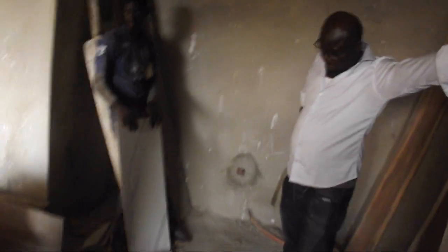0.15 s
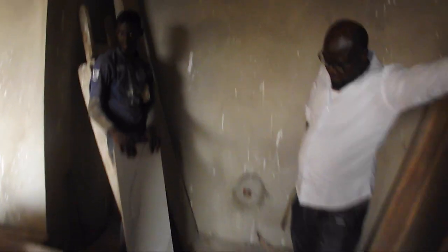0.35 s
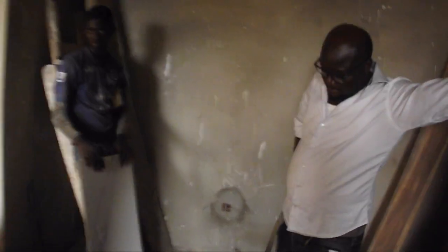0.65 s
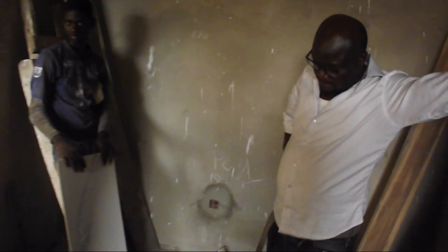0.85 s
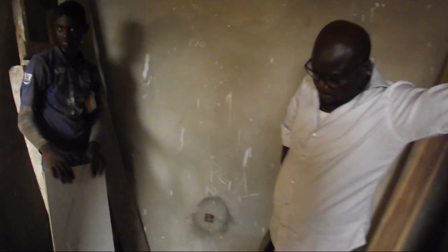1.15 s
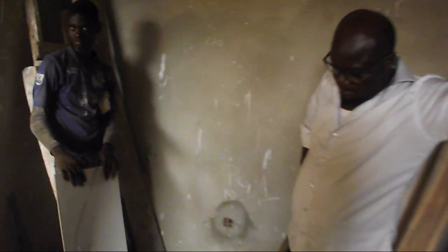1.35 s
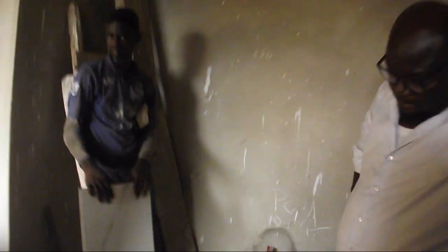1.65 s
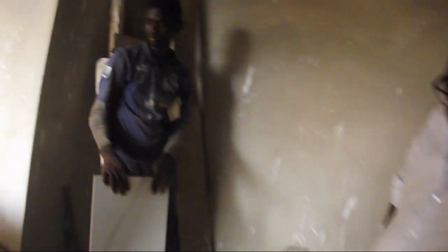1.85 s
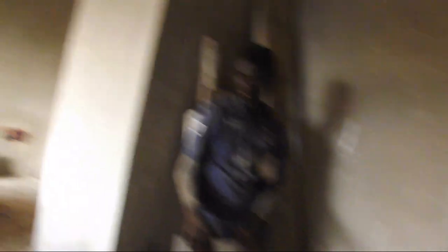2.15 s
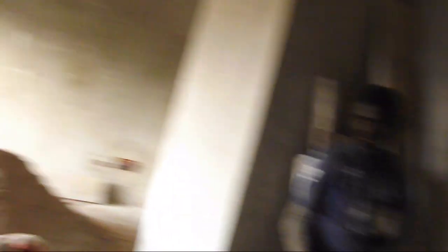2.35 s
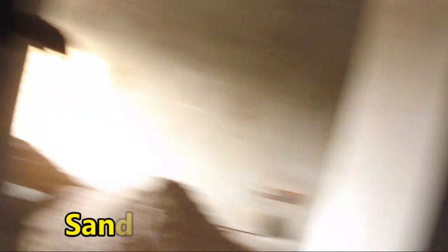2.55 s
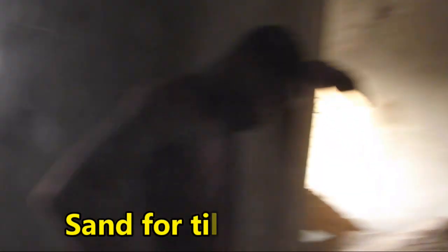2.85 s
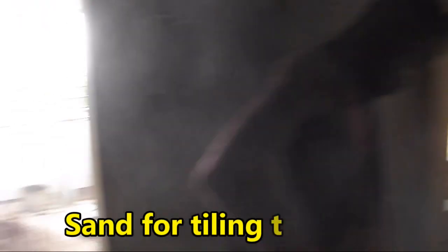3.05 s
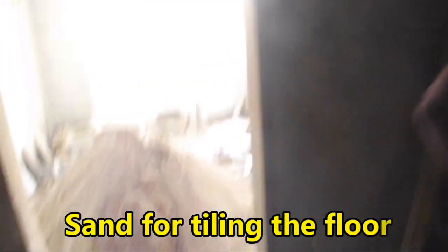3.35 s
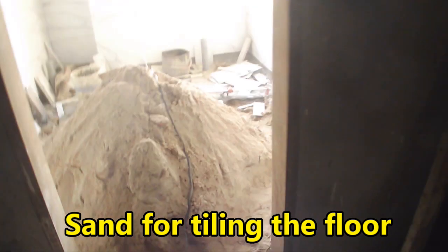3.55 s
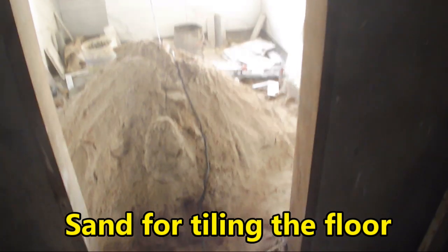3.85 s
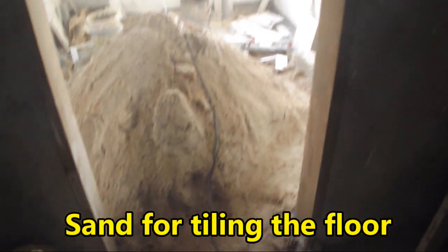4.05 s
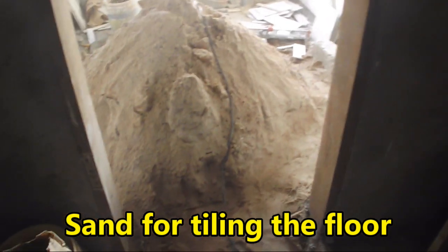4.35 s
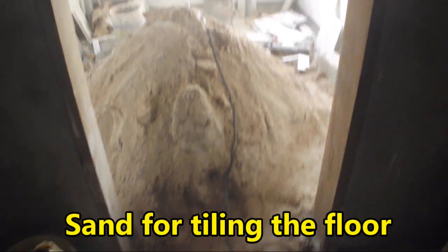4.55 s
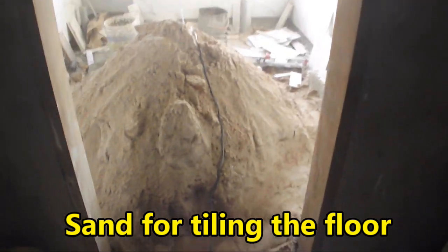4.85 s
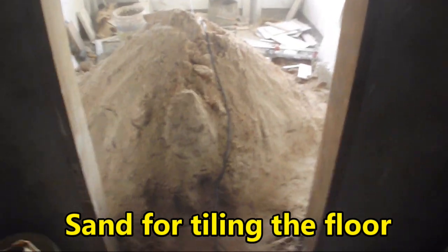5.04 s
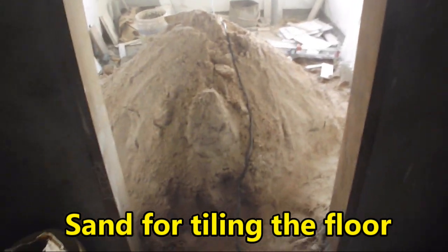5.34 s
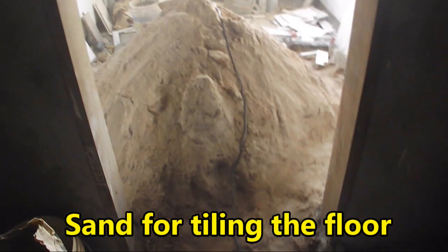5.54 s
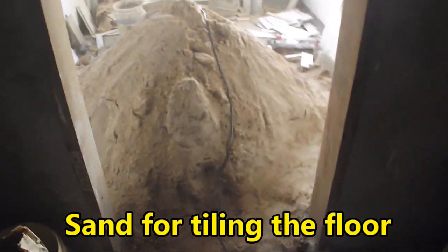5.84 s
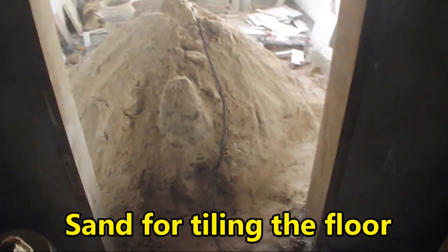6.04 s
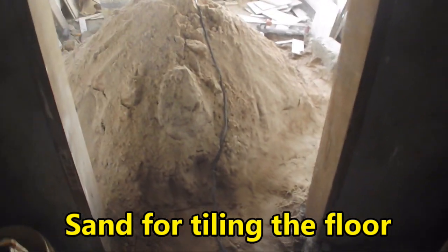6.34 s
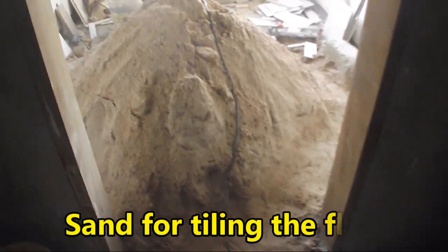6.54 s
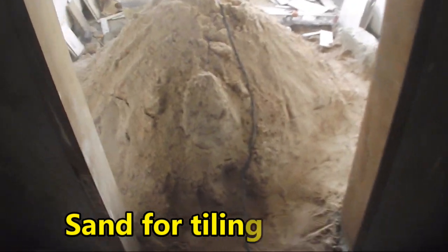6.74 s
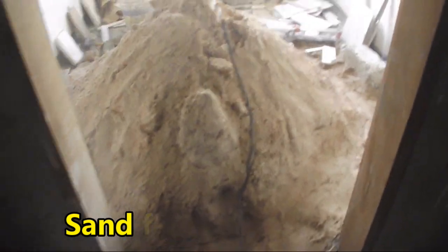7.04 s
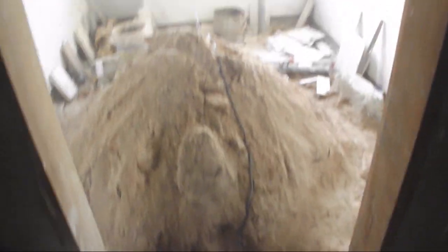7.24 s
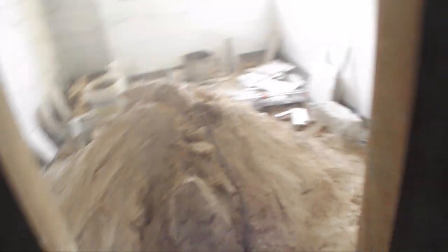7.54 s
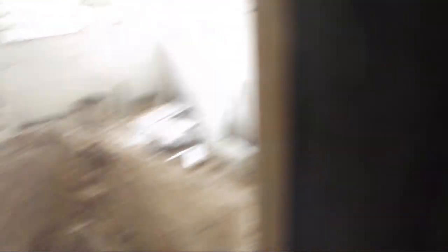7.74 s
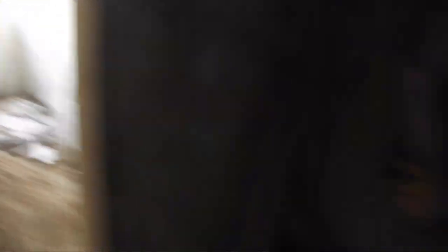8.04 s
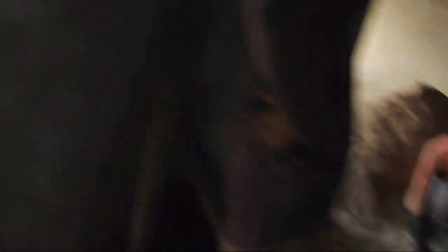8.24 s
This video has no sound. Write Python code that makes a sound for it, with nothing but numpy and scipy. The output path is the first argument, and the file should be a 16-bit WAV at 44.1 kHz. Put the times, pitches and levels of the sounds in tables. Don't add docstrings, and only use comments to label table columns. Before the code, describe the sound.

Loud, steady tile cutting in an unfinished building with hard walls. The spinning disc screeches brightly over a buzzing tonal whine that sags slightly in pitch. Frequent small snaps crackle through the scrape, making the level flutter as automatic gain ducks and recovers. The moving microphone shifts the colour, gaining body and low end in the last moments.

```python
import sys
import numpy as np
from scipy import signal
from scipy.io import wavfile
from scipy.ndimage import uniform_filter1d, minimum_filter1d

SR = 44100
rng = np.random.default_rng(int(sys.argv[2]) if len(sys.argv) > 2 else 0)


def convert_level_to_amplitude(level_db):
    exponent = np.asarray(level_db, float) / 20
    return 10 ** exponent


def store_wav(level_fs):
    pcm = np.round(np.clip(np.atleast_2d(level_fs), -1, 1) * 32767)
    wavfile.write(sys.argv[1], SR, pcm.T.astype(np.int16))


N = 369999


def rms_one(x):
    return x / np.sqrt(np.mean(x ** 2) + 1e-20)


def in_time(rows):
    s, *columns = np.transpose(rows)
    return [np.interp(np.arange(N) / SR, s, c) for c in columns]


def drift(rate_hz):
    r = np.exp(-200 * np.pi * rate_hz / SR)
    noise = rng.standard_normal(N // 100 + 1002)
    slow = signal.lfilter([1], [1, -2 * r, r * r], noise)[1000:]
    slow = rms_one(slow - slow.mean())
    return np.interp(np.arange(N) / 100, np.arange(len(slow)), slow)


def resonance(x, hz, width_hz):
    r = np.exp(-np.pi * width_hz / SR)
    poles = [1, -2 * r * np.cos(2 * np.pi * hz / SR), r * r]
    return signal.lfilter([(1 - r * r) / 2, 0, (r * r - 1) / 2], poles, x)


def rooms(x, t60, wet_db, count):
    age = np.arange(round(t60 * SR)) / SR
    place = np.arange(N) / N * (count - 1)
    walls = signal.butter(1, [250, 5500], "band", fs=SR, output="sos")
    wet = 0
    for k in range(count):
        tail = rng.standard_normal(len(age)) * convert_level_to_amplitude(-60 * age / t60)
        tail = signal.sosfilt(walls, tail / np.linalg.norm(tail))
        heard = signal.oaconvolve(x, tail)[:N]
        wet = wet + heard * np.cos(np.pi / 2 * np.clip(place - k, -1, 1))
    return x + convert_level_to_amplitude(wet_db) * wet


def evened(x, span_s):
    width = round(span_s * SR)
    power = uniform_filter1d(uniform_filter1d(x ** 2, size=width), size=width)
    return x / np.sqrt(power)


def tilt(x, boom_db, mids_db, air_db):
    below = []
    for hz in (260, 750, 1800, 6000):
        low_pass = signal.butter(4, hz, fs=SR, output="sos")
        below.append(signal.sosfiltfilt(low_pass, x))
    boom, mids, air = (convert_level_to_amplitude(v - np.mean(v)) - 1 for v in (boom_db, mids_db, air_db))
    return x + boom * (below[1] - below[0]) + mids * (below[2] - below[1]) + air * (x - below[3])


def swelling(resting, swells):
    levels = dict(resting)
    for s, order, length_s, rise_db in swells:
        near = np.clip((np.arange(N) / SR - s) / length_s, -1, 1)
        nearest = min(levels, key=lambda k: abs(k - order))
        levels[nearest] = levels[nearest] + rise_db * (1 - near ** 2) ** 2
    return levels


def comb_lines(turns, fade_db, wobble):
    # multiple of the turning rate, resting level in dB.
    weak_lines = [(2, -60.5), (2.5, -52), (3.25, -56), (3.5, -59.5), (4, -52), (5, -67.5), (6.5, -48),
                  (7, -47.5), (7.25, -56), (8, -46.5), (9, -44.5), (9.75, -59.5), (10, -42.5),
                  (10.75, -51.5), (11, -43.5), (12, -59.5), (13, -40.5), (14, -41.5), (14.75, -52.5),
                  (16, -39.5), (17, -35), (19, -59), (20, -45.5), (21, -45.5), (22, -50), (23, -31),
                  (24, -30), (25, -48)]
    # time in seconds, multiple, half length in seconds, rise in dB.
    weak_swells = [(0.953, 2, 0.78, 10), (1.05, 14.75, 0.22, 25.5), (1.25, 3.5, 0.58, 13),
                   (1.9, 11, 0.21, 13), (6.3, 2, 1.7, 9.5), (2.498, 14.75, 0.26, 18), (2.76, 5, 0.62, 28),
                   (2.35, 3.5, 0.83, 15.5), (2.95, 10.75, 0.34, 16), (3.146, 7.25, 0.95, 17),
                   (3.4, 14.75, 0.79, 22), (3.45, 9.75, 0.35, 19), (3.55, 13, 0.32, 9),
                   (3.594, 20, 0.34, 16), (4.247, 10.75, 0.52, 15.5), (4.35, 7.25, 0.98, 17.5),
                   (4.95, 9.75, 0.83, 20), (5.0, 12, 0.65, 24), (5.15, 21, 2.6, 21), (5.3, 10.75, 1.3, 18),
                   (5.9, 20, 4.7, 14), (8.3, 5, 0.5, 18), (6.16, 12, 0.88, 27), (6.71, 8, 0.33, 12),
                   (6.838, 9, 1.1, 10), (7.45, 9.75, 0.51, 21), (7.43, 12, 0.83, 30), (7.5, 6.5, 0.42, 5),
                   (8.15, 8, 0.49, 14), (8.3, 3.5, 1.6, 20.5)]
    # multiples of the turning rate, and their resting levels [dB].
    strong_orders = (1, 3, 6, 15, 18)
    strong_rest_db = [-63, -56.5, -46, -43, -36.5]
    strong_swells = [(5.3, 1, 1.7, 8), (8.2, 1, 1.36, 12), (1.046, 3, 1.42, 17), (3.002, 3, 1.1, 14.5),
                     (2.004, 3, 0.79, 5.5), (7.7, 3, 0.69, 11.5), (0.7, 6, 0.76, 6), (1.3, 6, 0.4, 3),
                     (2.33, 6, 0.37, -18), (2.78, 6, 0.15, 7), (4.2, 6, 2, 5), (6.382, 6, 0.77, 12),
                     (7.402, 6, 1.45, 7), (0.1, 15, 0.66, -36), (1.3, 15, 0.66, 11), (2.2, 15, 0.22, 11),
                     (3.6, 15, 0.55, 18), (4.455, 15, 0.4, 7), (5.47, 15, 0.63, 16.5),
                     (6.45, 15, 0.55, 12.5), (7.602, 15, 0.6, 11), (0.3, 18, 1.26, -20),
                     (1.006, 18, 0.29, 17), (2.9, 18, 1.4, 8), (4.007, 18, 0.29, 11), (4.814, 18, 0.43, 12),
                     (5.75, 18, 0.37, 12.5), (6.702, 18, 0.83, 17), (7.55, 18, 0.57, 14.5),
                     (8.05, 18, 0.25, -18)]
    resting = [(order, level_db + fade_db * drift(0.86)) for order, level_db in weak_lines]
    weak = swelling(resting, weak_swells)
    strong = swelling(zip(strong_orders, strong_rest_db), strong_swells)
    out = 0
    for order, level_db in {**weak, **strong}.items():
        phase = 2 * np.pi * (order * turns + rng.random())
        phase = phase + wobble * np.sqrt(order) * drift(4.6)
        out = out + np.sqrt(2) * convert_level_to_amplitude(level_db + 2.43 * drift(16.5)) * np.sin(phase)
    return out


def chip_times():
    # time in seconds, depth in dB of the gain control's step down.
    large_chips = [(0.058, 4), (0.148, 7), (0.743, 5.5), (0.991, 6), (1.107, 4.5), (1.215, 2), (1.406, 3),
                   (1.554, 3), (2.157, 3.5), (2.287, 8), (2.484, 6), (3.097, 6.5), (3.502, 5), (4.051, 6.5),
                   (4.297, 5.5), (4.51, 3.5), (4.815, 4.5), (5.112, 4.5), (5.5, 5), (5.626, 4.5),
                   (5.846, 4.5), (5.952, 3.5), (6.062, 5.5), (6.584, 2.5), (6.721, 2), (6.933, 5),
                   (7.208, 4), (7.6, 4.5), (7.981, 4), (8.16, 4)]
    gap_s, scatter = 0.082, 0.25
    s, depth_db = np.transpose(large_chips)
    ends = np.append(s, N / SR)
    small = []
    for a, b in zip(ends, ends[1:]):
        parts = max(round((b - a) / gap_s), 1)
        small.append(np.linspace(a, b, parts + 1)[1:-1])
    small = np.concatenate(small)
    luck = rng.standard_normal((200, 2))[:len(small)]
    small = small + scatter * gap_s * np.clip(luck[:, 0], -2, 2)
    small_depth_db = 2.5 + 1.32 * luck[:, 1]
    return np.append(s, small), np.append(depth_db, small_depth_db)


def chips(s, chip_db, hz, width_hz):
    ticks, luck = np.full(N, 1e-18), rng.standard_normal((len(s), 2))
    ticks[(s * SR).astype(int)] = convert_level_to_amplitude(0.52 * luck[:, 0]) * np.sign(luck[:, 1])
    rung = resonance(resonance(ticks, hz, width_hz), hz, width_hz)
    rung = signal.sosfilt(signal.butter(4, 6000, fs=SR, output="sos"), rung)
    return convert_level_to_amplitude(chip_db) * rung * SR / width_hz


def grit(turns, depth_db, grain_db):
    grains = rng.standard_normal(N) * convert_level_to_amplitude(grain_db * drift(155))
    return rms_one(grains * convert_level_to_amplitude(depth_db * np.cos(2 * np.pi * turns)))


def broad_noise(sources, patchy_db):
    # frequency in Hz, level in dB per Hz.
    grit_spectrum = [(20, -27.5), (40, -50.5), (100, -45.5), (245, -50), (290, -43.5), (700, -38.5),
                     (1600, -34), (2600, -26), (3300, -24), (4500, -26), (5200, -36.5), (7200, -44),
                     (11000, -57), (15800, -62)]
    hz, level_db = np.transpose(grit_spectrum)
    edges = 20 * 2 ** np.arange(0, 9.7, 1 / 3)
    out = 0
    for k, (low, high) in enumerate(zip(edges, edges[1:])):
        band_pass = signal.butter(3, [low, high], "band", fs=SR, output="sos")
        band = signal.sosfilt(band_pass, sources[k % 2])
        band_db = np.interp(np.log(low * high) / 2, np.log(hz), level_db)
        out = out + band * convert_level_to_amplitude(band_db + patchy_db * drift(3.3))
    return rms_one(out)


def disc_ring(sources, patchy_db):
    # width in Hz, level in dB.
    disc_hz = [345, 475, 620, 970, 1460, 2020, 2420, 2700, 2840, 2960, 3120, 3260, 3330, 3665, 3790, 4200,
               4370, 4945, 5480, 5745, 6560, 6700, 7270, 7770, 7910, 9090, 9630, 10500, 12200, 13800]
    disc_modes = [(24.3, -24), (16, -29), (54, -15.5), (18, -12), (23.148, -31), (37.037, -6), (50.5, -6.5),
                  (29, -27), (35, 3), (42, 0), (69.5, 6), (44.6, 1.5), (39.6, 2), (20, -1), (88, -2.5),
                  (154, -2), (97, 0), (38, 1.5), (61, -4), (37.2, -5), (58, -7), (57, -9.5), (59.4, -47),
                  (50.3, -15.5), (53, -17), (178, -24.5), (150, -23.5), (154, -24), (120, -47), (260, -35)]
    guard_hz = [10930, 11800, 12170, 12500, 13050, 14150, 14800, 15620]
    guard_modes = [(50, -56), (110, -56), (66, -34), (60, -48), (70, -48), (60, -47), (170, -50),
                   (150, -47)]
    out = 0
    for k, (hz, (width_hz, level_db)) in enumerate(zip(disc_hz + guard_hz, disc_modes + guard_modes)):
        rung = resonance(resonance(sources[k % 2], hz, width_hz), hz, 2.3 * width_hz)
        rung = resonance(rung, hz, hz / 3)
        flicker = 0.28 * drift(3.2) + 1.03 * drift(17.6)
        out = out + rung * convert_level_to_amplitude(level_db + patchy_db * flicker)
    return rms_one(out)


def ducking(s, depth_db, recover_s, attack_s, lag_s):
    steps = np.zeros(N)
    steps[((s + lag_s) * SR).astype(int)] = depth_db
    cut_db = signal.lfilter([1], [1, -np.exp(-1 / (recover_s * SR))], steps)
    quick = np.exp(-1 / (attack_s * SR))
    cut_db = signal.lfilter([1 - quick], [1, -quick], cut_db)
    return cut_db.mean() - cut_db


def scene():
    # time in seconds, turns per second.
    disc_speed = [(0.0, 136.5), (0.25, 136.65), (0.5, 137.15), (1.8, 137.7), (2.1, 137.55), (3.0, 135.7),
                  (3.75, 135.1), (4.7, 135.75), (5.25, 134.8), (5.75, 134.6), (6.25, 135.0), (6.7, 133.95),
                  (7.0, 134.55), (7.45, 134.55), (7.75, 133.45), (8.39, 133.55)]
    # time in seconds, level in dB, lift of the mids in dB by turning to the doorway.
    cut_course = [(0.0, -14.5, -1.5), (1.3, -14, -2.5), (1.6, -14.5, -1.5), (1.9, -13.5, -0.5),
                  (2.9, -15, 0), (4.7, -14.5, 2), (5.15, -15, -1), (5.65, -14, 2.5), (6.15, -14, 3),
                  (6.4, -16, 2.5), (7.35, -15.5, 3), (7.9, -13.5, 0.5), (8.39, -14.5, 4)]
    t = np.arange(N) / SR
    turns = np.cumsum(in_time(disc_speed)[0]) / SR
    level_db, mids_db = in_time(cut_course)
    swing = np.clip((t - 8.05) / 0.2, 0, 1)
    swing = swing + np.clip(1 - t / 0.7, 0, 1) * 0.13
    boom_db = 0.89 * mids_db + 8 * swing
    air_db = 0.3 * mids_db + 1.5 * swing

    sources = [grit(turns, depth_db=0.5, grain_db=2.0) for _ in range(4)]
    noise = convert_level_to_amplitude(-3) * broad_noise(sources, patchy_db=1.5)
    ring = convert_level_to_amplitude(-1) * disc_ring(sources[2:], patchy_db=2.0)
    cut = evened(rooms(noise + ring, t60=0.43, wet_db=0.5, count=11), span_s=0.18)
    cut = convert_level_to_amplitude(level_db - 0.3) * tilt(cut, boom_db, mids_db, air_db)

    lines = comb_lines(turns, fade_db=2.5, wobble=0.16)
    s, depth_db = chip_times()
    heard = cut + lines + chips(s, chip_db=-10.5, hz=3060, width_hz=2800)
    gain_db = ducking(s, depth_db, recover_s=0.068, attack_s=0.0024, lag_s=0.0052)
    return (heard * convert_level_to_amplitude(gain_db))[None]


def top_cut(x):
    return signal.sosfilt(signal.butter(12, 15990, fs=SR, output="sos"), x)


def record(dry):
    headroom = minimum_filter1d(np.minimum(1, .97 / (np.abs(dry) + 1e-9)), size=177)
    mix = dry * uniform_filter1d(uniform_filter1d(headroom, size=88), size=88)
    mix = signal.sosfilt(signal.ellip(12, .5, 60, 15730, fs=SR, output="sos"), mix)
    return top_cut(mix)


dry = scene()
out = record(dry)
store_wav(out)
```